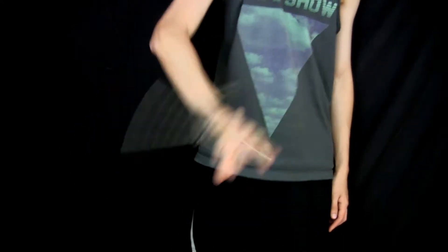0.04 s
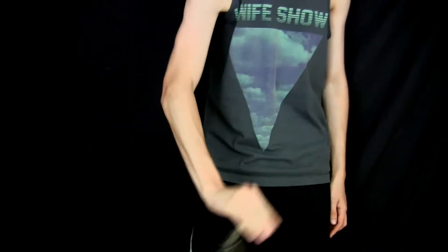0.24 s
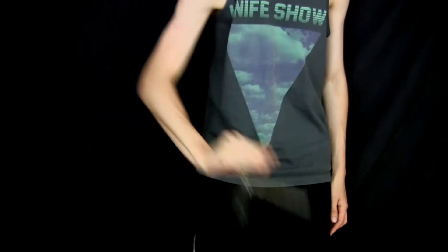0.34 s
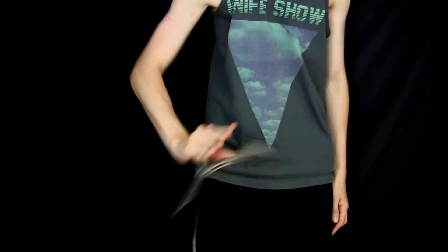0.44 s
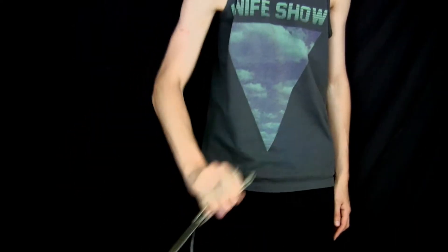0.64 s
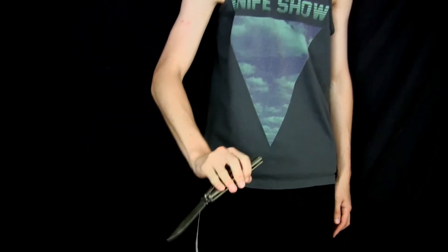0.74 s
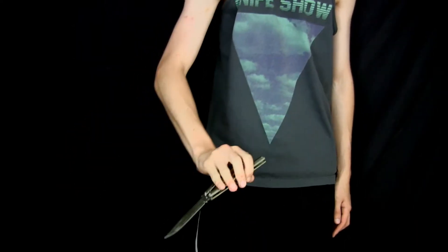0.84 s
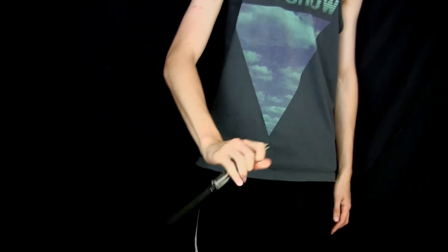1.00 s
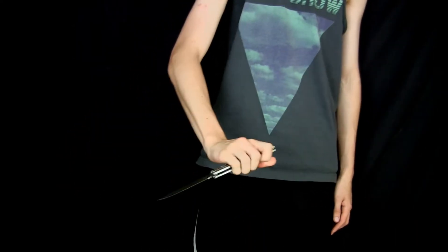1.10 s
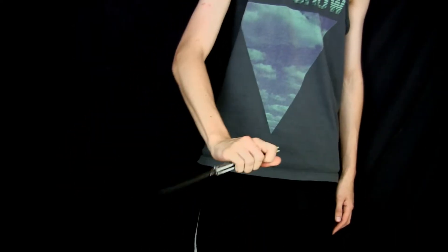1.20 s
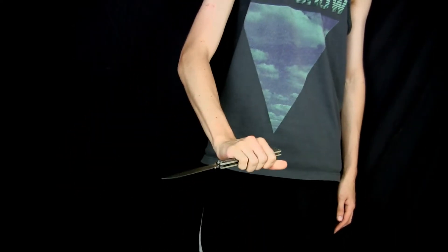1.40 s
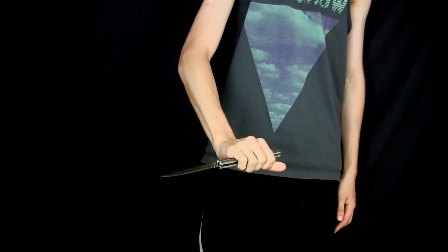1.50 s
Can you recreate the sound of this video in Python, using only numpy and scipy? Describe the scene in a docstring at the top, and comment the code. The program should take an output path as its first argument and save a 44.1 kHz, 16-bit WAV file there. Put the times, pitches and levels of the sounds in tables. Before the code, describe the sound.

Butterfly knife handles rattle and clack as it swings open, then click together.

```python
"""A light steel tick, then a rattle: a butterfly knife flips open by hand, close up in a fairly live room.
The loose pivots chatter, a handle slaps the steel and rebounds, the fingers shift their grip, and the
handles squeeze shut with one ringing click. Each hit is a noise crack, a short buzz and ringing steel
modes; the slides are gritty noise. Ventilation murmurs underneath, and the picture is stereo."""
import sys
import numpy as np
from scipy import signal
from scipy.fft import rfft, irfft
from scipy.io import wavfile
from scipy.ndimage import uniform_filter1d, minimum_filter1d

SR = 44100
rng = np.random.default_rng(int(sys.argv[2]) if len(sys.argv) > 2 else 0)


def dump(signal):
    """Clip the signal to [-1, 1] and save it as 16-bit WAV at the path in sys.argv[1]."""
    limited = np.clip(np.atleast_2d(signal).T, -1, 1)
    pcm = np.round(limited * 32767).astype(np.int16)
    wavfile.write(sys.argv[1], SR, pcm)


N = 68355

# Tone of the moving air: freq_hz, gain_db
AIR_EQ = [(15, -52), (25, -20), (108, -7), (149, -17), (206, -4), (317, -11), (344, -4.5), (439, -9),
          (531, -7), (575, -8), (1790, -8), (3340, -16.5), (16000, -33)]
# Fan and mains tones: pitch_hz, level_db
HUM_TONES = [(60, -83), (178, -75.5), (213, -75.5), (538, -72.5)]

# Ticks of the loose pivots: start_s, level_db, ring_db, tilt_db_per_octave
PIVOT_HITS = [(.0058, -22.5, 2, -4), (.056, -44, -15.5, -5), (.1057, -18, 2, 0), (.1137, -16.5, -7.5, -3.5),
              (.1197, -12, -7, 11.5), (.1227, -10.5, -14, -1.5), (.1279, -17, 8.5, 4.5),
              (.1514, -30.5, 4, -13.5), (.1742, -15.5, -2, -2), (.191, -21.5, -3.5, 0), (.2118, -23, 4, -6),
              (.224, -24, -12, -10), (.2277, -17.5, 8, -6), (.561, -29, -2, -12), (.5738, -23, -6.5, 1.5),
              (.5825, -25, -10.5, 3), (.6008, -27, -6.5, 4), (.690, -40.5, -8, 0), (.693, -28, -7.5, -7.5),
              (.6965, -37, -8.5, -11), (.99, -32, -11, -10.5), (1.0148, -26.5, -15.5, -1),
              (1.1055, -55, -10, 3), (1.2762, -38, -17, -6)]
# Ring of the free-swinging handle: pitch_hz, level_db, t60_s
PIVOT_MODES = [(2810, -13, .09), (4770, -16, .06), (6700, -14, .025), (6850, -14, .04), (7400, -14, .04),
               (10300, -9, .015), (10460, -4, .035), (10850, -10, .02), (13850, -15, .008)]
# Tone of a tick's crack: freq_hz, gain_db
PIVOT_EQ = [(100, -13.5), (400, -12.5), (1300, -15), (2500, 2.5), (3600, 0.5), (5700, 2.5), (8200, 2.5),
            (10400, 6), (12500, 0.5), (14000, -2.5), (15500, -21.5)]

# Steel sliding on steel and skin: start_s, length_s, level_db, tilt_db_per_octave
SLIDES = [(.008, 0.094, -57.5, 0), (0.104, .058, -46, 0.5), (0.202, 0.035, -44, 2.5),
          (.262, 0.044, -42.5, 0.5), (0.57, 0.055, -51.5, 1), (0.679, 0.061, -60.5, 0)]
# Tone of the friction: freq_hz, gain_db
SLIDE_EQ = [(30, -14), (100, -4), (300, -2), (900, 0), (1600, -4.5), (2700, 0), (5000, -5), (6700, -2),
            (10000, -9), (13500, -8.5), (15300, -25.5)]

# The handle's slap and rebounds: start_s, level_db, ring_db, tilt_db_per_octave
SLAP_HITS = [(.2358, 12.5, -5.5, 0.95), (.2702, 6, -4.5, 2.5), (.2735, 0, -1, 0), (.2762, -2, 3.5, 1)]
# Ring of the struck knife: pitch_hz, level_db, t60_s
SLAP_MODES = [(2290, -11, .02), (2645, -13, .04), (6060, -7, .012), (6275, -6, .1), (6380, 0, .012),
              (6448, -3, .2), (6590, -4, .015), (6730, -12, .08), (9220, -14, .02), (10750, -11, .04),
              (10990, -11, .05), (14100, -16, .01)]
# Tone of the slap's crack: freq_hz, gain_db
SLAP_EQ = [(500, -27), (850, -27), (1300, -11.5), (1900, 0.5), (2550, 4), (3400, -3), (4200, -4), (5200, 1),
           (6500, -3), (7400, 2.5), (8300, -8.5), (8950, 1), (9700, -1), (10800, 4.5), (12400, -12),
           (14000, 0), (15300, -20.5)]

# The handles meeting: start_s, level_db, ring_db, tilt_db_per_octave
CLICK_HITS = [(1.0218, -8, -7, 0.5), (1.0236, -17.5, -4, 11)]
# Ring of the closed knife: pitch_hz, level_db, t60_s
CLICK_MODES = [(2595, 1, .25), (2640, -2, .11), (4660, -15, .04), (4900, -9, .03), (5090, -12, .035),
               (6630, -9, .045), (10650, -12, .015), (11610, -16, .015)]
# Tone of the click's crack: freq_hz, gain_db
CLICK_EQ = [(100, -23.5), (800, -5), (1500, -6.5), (2550, 11.5), (3600, -5), (5000, 1), (8000, -4),
            (10700, 1.5), (12500, -5), (14000, -3), (15300, -19)]

# Reverb time by band: freq_hz, t60_s
REVERB_DECAY = [(200, 1), (1000, .55), (2500, 0.4), (6500, 0.41), (10500, .45), (15000, .3)]
# Tone of the reverb: freq_hz, gain_db
REVERB_EQ = [(200, 0.5), (1000, -1), (2500, -2), (6500, -2.5), (10000, -10.5), (15000, -8.5)]
# Stereo width, as an EQ on the side channel: freq_hz, gain_db
SIDE_EQ = [(60, -11), (250, -4.5), (500, -3), (1200, -12.5), (2500, -12), (4000, -10.5), (6300, -7),
           (8500, -4.5), (10500, -8.5), (14000, -13.5)]


def undb(db):
    """Decibels to gain."""
    return 10 ** (np.asarray(db) / 20)


def unit(x):
    """Scale to unit energy."""
    return x / np.sqrt(np.sum(x ** 2))


def curve_at(points, hz):
    """Read a (freq_hz, value) curve on a log-frequency axis."""
    knots_hz, values = np.array(points).T
    return np.interp(np.log(np.maximum(hz, 1)), np.log(knots_hz), values)


def freqs(size):
    """Bin frequencies for a signal of this many samples."""
    return np.fft.rfftfreq(size, 1 / SR)


def eq(x, points):
    """Filter by a (freq_hz, gain_db) curve."""
    return irfft(rfft(x) * undb(curve_at(points, freqs(len(x)))), len(x))


def minimum_phase(gain):
    """The tightest impulse with this spectrum, free of pre-ring."""
    cepstrum = irfft(np.log(gain + 1e-9))
    half = len(cepstrum) // 2
    cepstrum[1:half] *= 2
    cepstrum[half + 1:] = 0
    return irfft(np.exp(rfft(cepstrum)))


def stereo(mid, side):
    """Mid and side to left and right."""
    return np.array([mid + side, mid - side])


def ventilation(air_db=-59, waver_depth=.3, waver_points=12):
    """The bed: soft, steady air with fan and mains tones wavering in level and phase."""
    t = np.arange(N) / SR
    mid, side = (unit(eq(rng.standard_normal(N), AIR_EQ)) * np.sqrt(N) * undb(air_db) for _ in range(2))
    knots_s = np.linspace(0, t[-1], waver_points)
    waver = lambda: waver_depth * np.interp(t, knots_s, rng.standard_normal(waver_points))
    for hz, level_db in HUM_TONES:
        level = np.sqrt(2) * undb(level_db) * (1 + waver())
        mid += level * np.sin(2 * np.pi * hz * t + 2 * waver())
    return stereo(mid, eq(side, SIDE_EQ))


def flat_burst(envelope, smooth_bins=48):
    """A noise burst with its broad spectral bumps ironed out."""
    spectrum = rfft(rng.standard_normal(len(envelope)) * envelope)
    bumps = np.sqrt(uniform_filter1d(abs(spectrum) ** 2, smooth_bins) + 1e-12)
    return unit(irfft(spectrum / bumps)[:len(envelope) // 2])


def steel_hits(hits, modes, tone, crack_s, buzz_s, buzz_db, low_cut_hz, scatter_db=1, size=4096):
    """Steel on steel: a crack, a brief buzz in the joints and ringing modes; little bass radiates."""
    t, out = np.arange(N) / SR, np.zeros(N)
    hz = freqs(size)
    envelope = unit(np.exp(-t[:size] / crack_s)) + undb(buzz_db) * unit(np.exp(-t[:size] / buzz_s))
    for start_s, level_db, ring_db, tilt_db in hits:
        # brightness tilts over two octaves either side of 6 kHz
        tilt = lambda f: undb(tilt_db * np.log2(np.clip(f / 6000, 1 / 4, 4)))
        impulse = unit(minimum_phase(undb(curve_at(tone, hz)) * tilt(hz)))
        crack = signal.fftconvolve(flat_burst(envelope), impulse)
        hit = np.pad(crack, (0, N - len(crack)))
        for pitch_hz, mode_db, t60_s in modes:
            spot_db = scatter_db * rng.standard_normal()  # the ring varies with the spot struck
            ring = np.sin(2 * np.pi * (pitch_hz * t + rng.random())) * np.exp(-np.log(1000) * t / t60_s)
            hit += undb(mode_db + ring_db + spot_db) * tilt(pitch_hz) * unit(ring)
        onset = int(start_s * SR)
        out[onset:] += undb(level_db) * hit[:N - onset]
    return signal.sosfilt(signal.butter(2, low_cut_hz, "high", fs=SR, output="sos"), out)


def pivot_rattle():
    """The handles knock in their loose pivots: small, bright ticks."""
    return steel_hits(PIVOT_HITS, PIVOT_MODES, PIVOT_EQ,
                      crack_s=.00082, buzz_s=.006, buzz_db=-1, low_cut_hz=250)


def slides(grain_db=2):
    """Short swells of grit as the handles turn on their pivots and in the fingers."""
    t, out = np.arange(N) / SR, 0
    for start_s, length_s, level_db, tilt_db in SLIDES:
        grains = rng.standard_normal(N) * undb(grain_db * rng.standard_normal(N))
        grit = eq(grains, [(hz, db + tilt_db * np.log2(hz)) for hz, db in SLIDE_EQ])
        swell = np.sin(np.pi * np.clip((t - start_s) / length_s, 0, 1))
        out += undb(level_db) * unit(grit) * np.sqrt(N) * swell
    return out


def handle_slap():
    """The big hit: a swinging handle lands on the steel, buzzes and chatters back."""
    return steel_hits(SLAP_HITS, SLAP_MODES, SLAP_EQ,
                      crack_s=.0014, buzz_s=.01, buzz_db=6.5, low_cut_hz=1000)


def closing_click():
    """The handles squeeze shut: two contacts so close that they fuse into one ringing click."""
    return steel_hits(CLICK_HITS, CLICK_MODES, CLICK_EQ,
                      crack_s=.00076, buzz_s=.0096, buzz_db=3, low_cut_hz=799)


def reverb_tail(predelay_s=.011, build_s=.0017):
    """Diffuse reflections that bloom quickly and die sooner in the treble."""
    t, hz = np.arange(N) / SR, freqs(N)
    spectrum = rfft(rng.standard_normal(N)) * undb(curve_at(REVERB_EQ, hz))
    bloom = 1 - np.exp(-np.maximum(t - predelay_s, 0) / build_s)
    tail = 0
    for band_hz, t60_s in REVERB_DECAY:
        crossfade = curve_at([(f, f == band_hz) for f, _ in REVERB_DECAY], hz)
        band = irfft(spectrum * crossfade, N)
        tail += band * unit(bloom * np.exp(-np.log(1000) * t / t60_s))
    return tail


def room(knife, send_db=-2, widen_db=-5.5, smear_samples=48):
    """The direct sound, slightly different at each ear, and the answer of the walls."""
    walls = stereo(reverb_tail(), eq(reverb_tail(), SIDE_EQ))[:, :SR]
    wet = signal.fftconvolve(knife[None], walls, axes=1)[:, :N]
    smeared = np.convolve(knife, unit(rng.standard_normal(smear_samples)))[:N]
    side = undb(widen_db) * eq(smeared, SIDE_EQ)
    return stereo(knife, side) + undb(send_db) * wet


def scene():
    """The knife in the room, over the ventilation bed."""
    knife = pivot_rattle() + handle_slap() + closing_click() + slides()
    return room(knife) + ventilation()


def record(dry, ceiling=.7, limiter_s=.003, high_cut_hz=15300):
    """A fast limiter holds the loudest peaks down, then a steep filter cuts the top."""
    window = int(limiter_s * SR)
    safe_gain = np.minimum(1, ceiling / (abs(dry).max(axis=0) + 1e-9))
    smooth_gain = uniform_filter1d(minimum_filter1d(safe_gain, window), window)
    high_cut = signal.ellip(8, .2, 70, high_cut_hz, fs=SR, output="sos")
    return signal.sosfilt(high_cut, dry * smooth_gain)


dry = scene()
out = record(dry)
dump(out)
```